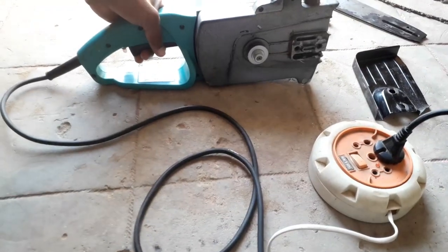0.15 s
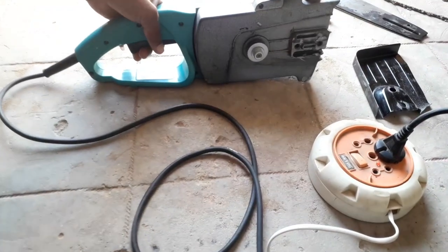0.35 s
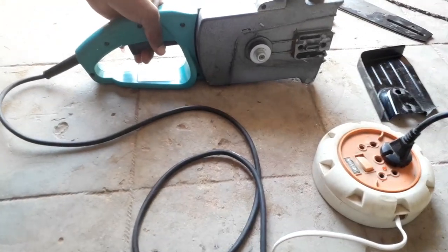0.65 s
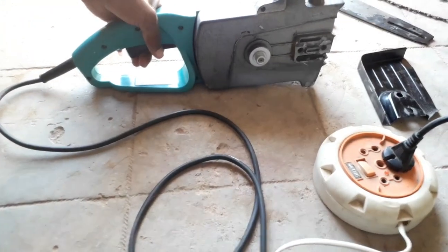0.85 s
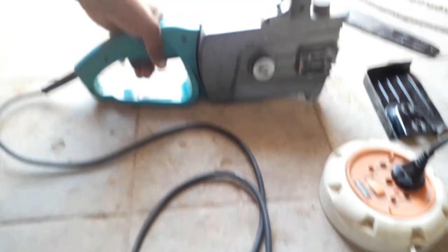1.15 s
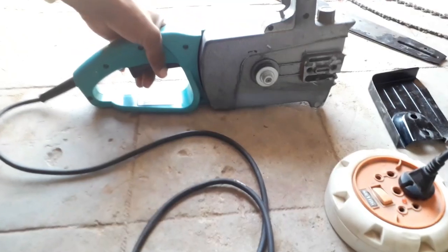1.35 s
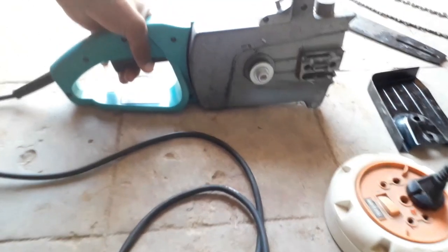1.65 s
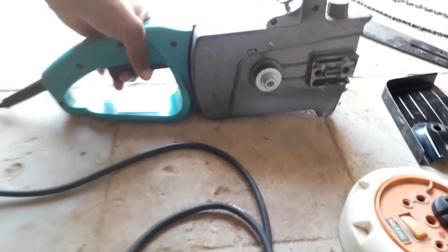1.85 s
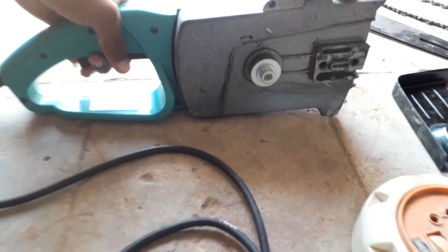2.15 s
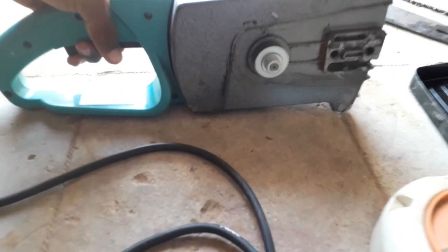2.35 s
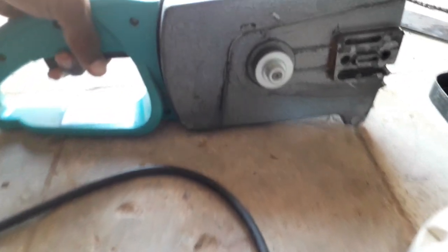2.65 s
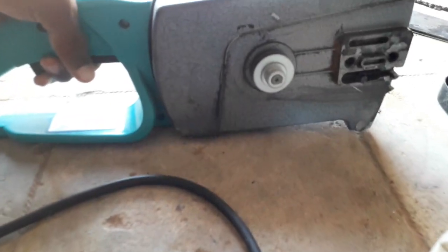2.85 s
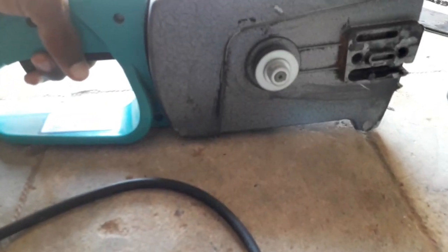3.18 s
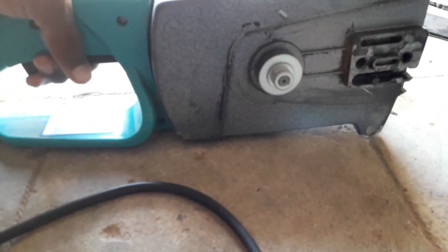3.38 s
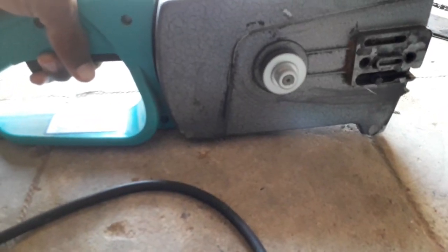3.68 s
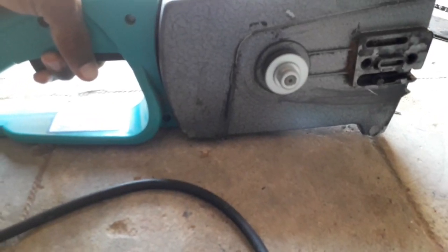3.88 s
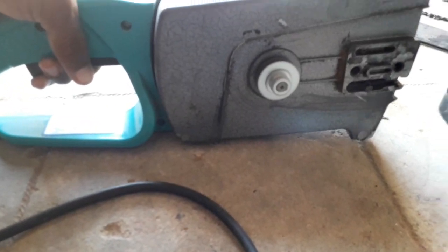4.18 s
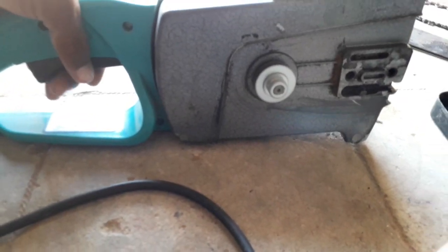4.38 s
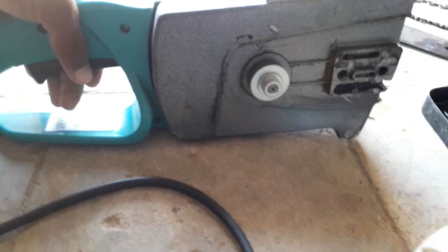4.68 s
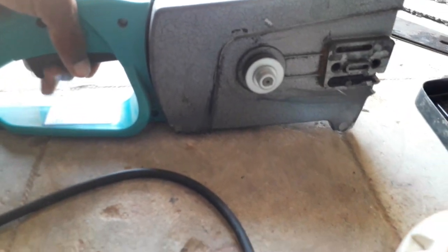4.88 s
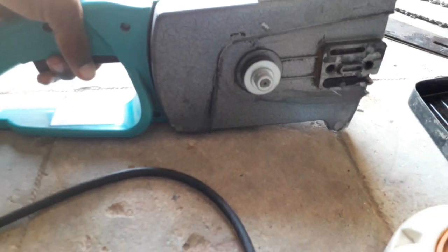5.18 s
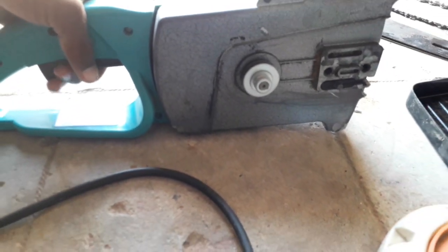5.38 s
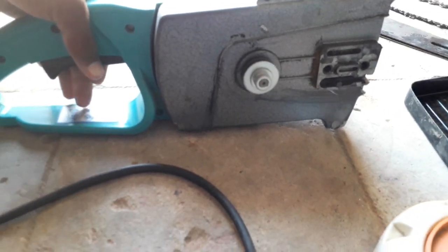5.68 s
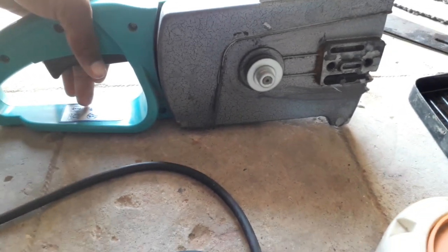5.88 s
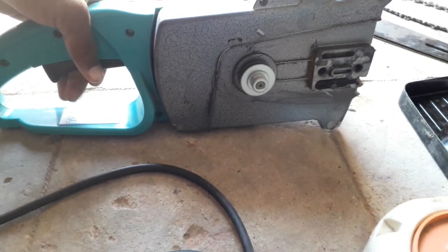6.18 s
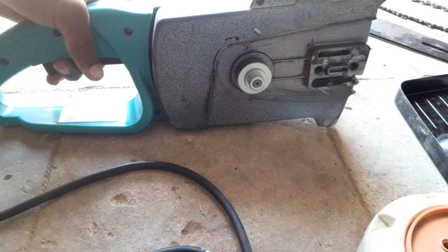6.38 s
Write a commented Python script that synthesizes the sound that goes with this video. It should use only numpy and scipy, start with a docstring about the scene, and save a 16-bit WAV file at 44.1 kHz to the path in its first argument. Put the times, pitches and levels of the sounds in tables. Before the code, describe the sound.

Close up in a hard-surfaced indoor space, the gears of a slowing electric chainsaw knock and rattle unevenly, ringing the housing. A two-second burst of power spins the motor up into a harsh, hissing grind with rushing air and a thin whine. The power cuts, the rasp swells briefly, and the motor coasts down as separate clacks come through again.

```python
"""Gears clack and grind in an electric chainsaw that lies on a stone floor without bar or chain.
Its motor coasts down, gets a two-second burst of power and coasts again. The unloaded teeth knock
across their backlash and ring the housing, the cooling fan rushes, the unbalanced rotor hums and the
commutator whines faintly. The close microphone's gain control and limiter hold the level."""
import sys
import numpy as np
from scipy import signal
from scipy.fft import rfft, irfft, next_fast_len
from scipy.io import wavfile
from scipy.ndimage import uniform_filter1d, minimum_filter1d

SR = 44100
rng = np.random.default_rng(int(sys.argv[2]) if len(sys.argv) > 2 else 0)


def wrap_up_sound(samples):
    """Save the sound to the file named by the first command line argument, as 16-bit audio."""
    columns = np.atleast_2d(samples).T
    # keep every value between -1 and 1, then stretch to whole-number steps
    tamed = np.clip(columns, -1, 1)
    steps = np.round(tamed * 32767).astype(np.int16)
    wavfile.write(sys.argv[1], SR, steps)


N = 288061
TIME = np.arange(N) / SR
TRIGGER_ON_S, TRIGGER_OFF_S = 2.26, 4.27
WORKING_SPEED_RPS = 300
LOAD_GEARS_DB = 5.5  # full torque presses the teeth together
CUTOFF_HZ = 15600


# Hardest knocks of the teeth. Each row: start in seconds, relative level in dB.
HARD_KNOCKS = [(0.0802, -2), (0.2443, -1), (0.2564, 1), (0.3287, 0), (0.3696, 0), (0.412, -1), (0.4509, 0),
               (0.6958, -2), (0.7447, -1), (0.7554, 0), (0.8859, 0), (1.0061, -3), (1.062, -1),
               (1.1074, -2), (1.1243, 0), (1.1648, -2), (1.1862, 0), (1.1964, 0), (1.3728, -3),
               (1.4436, -2), (1.517, 0), (1.5808, -1), (1.6487, -3), (1.6741, 0), (1.7414, 0), (1.8163, -1),
               (1.8337, -2), (1.9295, -5), (2.0248, -1), (2.0408, 0), (2.1171, -3), (2.1385, -1),
               (2.164, -4), (2.2333, -3), (2.2503, -3), (2.2847, 1), (2.3156, 1), (2.3324, 1), (2.4473, 1),
               (5.3014, -1), (5.5593, 0), (5.664, 0), (5.7224, 0), (5.7997, 0), (5.9125, 0), (5.9768, -4),
               (6.0132, 1), (6.094, -2), (6.1484, 1), (6.4088, -3), (6.5106, -1)]

def gear_knocks(turns, speed_rps, load, gain_db, scuff_s, scuff_share):
    """Teeth knock across their backlash: each hard contact scuffs briefly along the tooth."""
    rows = [*HARD_KNOCKS, *rebounds(speed_rps, loss_db=9), *light_knocks(turns, speed_rps, load)]
    force, age_s = np.zeros(N + SR), np.arange(SR // 200) / SR
    roughness = rng.standard_normal(N + SR)
    touch_to_peak_s = .0006
    for start_s, db in rows:
        at = round((start_s + touch_to_peak_s) * SR)
        scuff = roughness[at:at + len(age_s)] * np.exp(-age_s / scuff_s)
        knock = (age_s == 0) + scuff_share * scuff / np.linalg.norm(scuff)
        force[at:at + len(age_s)] += from_db(db + gain_db) * knock
    return struck_housing(force[:N])


def rebounds(speed_rps, loss_db):
    """The teeth meet again one rotor turn after each hard knock. Returns (s, dB) rows."""
    return [(s + 1 / np.interp(s, TIME, speed_rps), db - loss_db) for s, db in HARD_KNOCKS]


def light_knocks(turns, speed_rps, load, chance_per_turn=.4, spread_db=7):
    """In some turns the teeth lose contact and knock lightly. Returns (s, dB) rows."""
    count = int(turns[-1])
    draw, place, softness = rng.random((count, 3)).T
    start_s = np.interp(np.arange(count) + place, turns, TIME)
    top_db = -2 + speed_db(speed_rps, power=.28) + LOAD_GEARS_DB * load
    level_db = np.interp(start_s, TIME, top_db) - spread_db * softness
    return np.column_stack([start_s, level_db])[draw < chance_per_turn]


# Housing resonances. Each row: centre in Hz, width in Hz, lift in dB.
HOUSING_MODES = [(1200, 32, 6.5), (1985, 20, 5), (2471, 320, 9), (3310, 240, 8), (4180, 64, 2),
                 (5000, 260, -5.5), (5314, 260, 7), (6300, 310, 9.5), (8000, 160, 1.5), (9440, 230, 9)]
# Spectrum of a knock. Each row: frequency in Hz, relative density in dB.
KNOCK_SPECTRUM = [(60, -56), (300, -47), (900, -23.5), (1700, -11), (2700, -10.5), (3300, -4.5), (4500, -1),
                  (5050, 3), (5900, -9.5), (7400, -15.5), (8700, -12), (10200, -16.5), (12000, -27.5),
                  (15500, -36)]

def struck_housing(force, travel_s=.0005, floor_echo_s=.00103, floor_echo_db=-4.5):
    """Knocks cross the housing as bending waves, highs first; the stone floor reflects them."""
    hz = np.fft.rfftfreq(N, 1 / SR)
    lag_cycles = travel_s * (2 * np.sqrt(hz * CUTOFF_HZ) - hz)  # wave speed grows as sqrt(hz)
    dispersed = irfft(rfft(force) * np.exp(-2j * np.pi * lag_cycles), N)
    direct = coloured(dispersed, KNOCK_SPECTRUM, HOUSING_MODES)
    return direct + from_db(floor_echo_db) * delayed(direct, floor_echo_s)


# Spectrum of sliding teeth and brushes. Each row: frequency in Hz, relative density in dB.
GRIND_SPECTRUM = [(60, -30), (300, -28), (900, -28.5), (1400, -5.5), (1700, -1), (2700, -6), (3050, -2),
                  (4200, 7), (5300, -3), (5900, -8.5), (7500, -5), (9300, -13), (10800, -14),
                  (15500, -23.5)]

def grinding(turns, speed_rps, load, mesh_db, rattle_db):
    """Sliding teeth and brushes hiss; the mesh ticks tooth by tooth; the pinion rattles once a turn."""
    mesh = rms_one(contacts(turns, per_turn=8, spread_db=3) / np.sqrt(speed_rps))
    rattle = rms_one(contacts(turns, per_turn=1, spread_db=3) / np.sqrt(speed_rps))
    sliding = coloured(rng.standard_normal(N) + from_db(mesh_db) * mesh, GRIND_SPECTRUM, HOUSING_MODES)
    rattling = from_db(rattle_db) * struck_housing(rattle)
    level_db = -14.5 + speed_db(speed_rps, power=.68) + LOAD_GEARS_DB * load + overrun_db()
    return from_db(level_db) * rms_one(sliding + rattling)


def contacts(turns, per_turn, spread_db):
    """Contacts in step with the rotor, uneven in force and slightly uneven in timing."""
    at = np.flatnonzero(np.diff(np.floor(turns * per_turn + .15 * drift(300))) > 0)
    strength = from_db(spread_db * np.clip(rng.standard_normal(N), -2, 2))
    clicks = np.zeros(N)
    clicks[at] = (strength * rng.choice([-1, 1], N))[at]
    return clicks


def overrun_db(peak_db=2.5, rise_s=.23):
    """After trigger release the rasp swells as the driven gear pushes the slowing rotor."""
    age = np.maximum(TIME - TRIGGER_OFF_S, 0) / rise_s
    return peak_db * (age * np.exp(1 - age)) ** 2


def motor(start_rps=164.5, half_torque_rps=227.4, step_s=.002):
    """Speed (turns/s) and torque (0-1): the motor pulls while the trigger is held, against drag."""
    stall_rps_per_s = 896
    times_s, speed_rps, rows = np.arange(0, N / SR, step_s), start_rps, []
    for s in times_s:
        torque = (TRIGGER_ON_S < s < TRIGGER_OFF_S) / (1 + (speed_rps / half_torque_rps) ** 3.5)
        rows.append((speed_rps, torque))
        brush_drag, grease_drag, fan_drag = 26.7, .1207 * speed_rps, .000953 * speed_rps ** 2
        speed_rps += step_s * (stall_rps_per_s * torque - brush_drag - grease_drag - fan_drag)
    return [np.interp(TIME, times_s, column) for column in np.transpose(rows)]


# Spectrum of the casing draught. Each row: frequency in Hz, relative density in dB.
DRAUGHT_SPECTRUM = [(25, -27), (60, -30), (130, -11.5), (260, -10), (370, -2.5), (450, 1.5), (520, -1),
                    (610, 2.5), (720, -6), (950, -6.5), (1600, -13), (3000, -42), (8000, -31)]
# Vent jet hiss as heard through the microphone's 3-5.5 kHz presence boost.
# Each row: frequency in Hz, relative density in dB.
JET_WITH_MIC_BOOST = [(30, -41), (150, -13), (330, -0.5), (700, -2.5), (1600, 2), (2200, -14), (2750, 2),
                      (2950, 10), (5500, 11.5), (6000, 2.5), (8600, 2.5), (10400, -2), (11800, -1.5),
                      (15500, -12.5)]
# Air cavity modes of the motor casing. Each row: centre in Hz, width in Hz, lift in dB.
CAVITY_MODES = [(382, 36, -3.5), (467, 27, 3), (749, 25, 7.5), (844, 16, 4.5), (1110, 26, 6.5),
                (1705, 29, 1), (2390, 100, 6)]

def fan(speed_rps, flutter_db):
    """Air drones through the motor casing and, at high speed, jets out of the vents."""
    draught = coloured(rng.standard_normal(N), DRAUGHT_SPECTRUM, CAVITY_MODES)
    jet = coloured(rng.standard_normal(N), JET_WITH_MIC_BOOST, CAVITY_MODES)
    draught_db = -22 + speed_db(speed_rps, power=1.673)
    jet_db = -9 + speed_db(speed_rps, power=2.76) + flutter_db * drift(60)
    return from_db(draught_db) * draught + from_db(jet_db) * jet


# Rocking of the body on the floor. Each row: centre in Hz, width in Hz, lift in dB.
ROCKING_MODES = [(125, 13, 18), (184, 22, 8)]

def hum(turns, speed_rps, waver_db, octave_db):
    """Unbalance hums once a turn; its octave is heard only while it rocks the body."""
    fundamental = from_db(peaks_at(ROCKING_MODES, speed_rps)) * np.sin(2 * np.pi * turns)
    octave = (from_db(peaks_at(ROCKING_MODES, 2 * speed_rps)) - 1) * np.sin(2 * np.pi * 2 * turns)
    level_db = -32.5 + speed_db(speed_rps, power=3.74) + waver_db * drift(14)
    return np.sqrt(2) * from_db(level_db) * (fundamental + from_db(octave_db) * octave)


def jolt(gain_db, decay_s):
    """The kick of switching on rocks the body briefly in its lowest mode."""
    age_s = np.maximum(TIME - TRIGGER_ON_S, 0)
    envelope = (age_s / decay_s) ** 2 * np.exp(-age_s / decay_s)
    return from_db(gain_db) * envelope * np.sin(2 * np.pi * ROCKING_MODES[0][0] * age_s)


# Whine partials. Each row: multiple of rotor speed (rounded in use), level in dB, power of speed,
# change in dB as the microphone moves in.
WHINE_PARTIALS = [(32, -32, -0.2, -1.5), (36, -33.5, 5, 0.5), (48, -44, 5, -3), (64.4, -36.5, -0.5, -19),
                  (95, -47, -0.5, -8)]
# Radiation of the whine by the housing. Each row: frequency in Hz, gain in dB.
WHINE_RADIATION = [(1500, -6), (3500, -7.5), (4600, 1), (5700, 0), (6150, 2), (6700, 0), (8300, -3),
                   (8850, 7.5), (9300, 0.5), (10300, 2), (11600, 3), (12300, 0), (13200, -8), (15000, -14)]

def whine(turns, speed_rps, load, shiver_turns, waver_db, load_db=9, move_in_s=(1.2, 2.8)):
    """Commutator bars, slots and teeth whine through housing resonances; shaft shiver widens each tone."""
    out, shaft_turns = 0, turns + shiver_turns * drift(200)
    slow_fade = np.minimum(speed_rps / 100, 1) ** 2
    moved_in = np.interp(TIME, move_in_s, (0, 1))
    for multiple, db, power, change_db in WHINE_PARTIALS:
        order = round(multiple)
        hz = order * speed_rps
        level_db = db + speed_db(speed_rps, power) + load_db * load + change_db * moved_in
        level_db += at_hz(WHINE_RADIATION, hz) + waver_db * (drift(18) + drift(200))
        out += slow_fade * from_db(level_db) * (hz < CUTOFF_HZ) * np.sin(2 * np.pi * order * shaft_turns)
    return np.sqrt(2) * out


# Gusts from the vents. Each row: peak time in seconds, level in dB.
VENT_GUSTS = [(3.21, -39), (3.6, -41), (3.665, -41)]

def gusts(half_width_s, band_hz):
    """Each gust brushes the microphone with a short, soft rumble."""
    swell = sum(from_db(db) * np.exp(-((TIME - s) / half_width_s) ** 2) for s, db in VENT_GUSTS)
    band = signal.butter(2, band_hz, "band", fs=SR, output="sos")
    return swell * rms_one(signal.sosfilt(band, rng.standard_normal(N)))


def room(x, t60_s, level_db):
    """Hard walls return a short diffuse tail."""
    age_s = np.arange(SR // 2) / SR
    tail = rng.standard_normal(len(age_s)) * from_db(-60 * age_s / t60_s) * (age_s > .002)
    tail = signal.sosfilt(signal.butter(1, 7000, fs=SR, output="sos"), tail)
    return from_db(level_db) * signal.fftconvolve(x, tail / np.linalg.norm(tail))[:N]


def gain_control(x, window_s, threshold_db, cut_share, recovery_db_per_s):
    """The gain sinks when the sound gets loud and creeps back slowly."""
    level_db = 10 * np.log10(lagged(np.mean(x ** 2, axis=0), window_s) + 1e-12)
    cut_db = cut_share * np.maximum(level_db - threshold_db, 0)
    recovered_db = recovery_db_per_s * TIME
    return x * from_db(recovered_db - np.maximum.accumulate(cut_db + recovered_db))


def coloured(x, spectrum, modes):
    """Causal filter of unit energy: a smooth spectrum with resonances on top."""
    size = 2 * next_fast_len(N // 2 + SR // 4)
    hz = np.arange(size // 2 + 1) * SR / size
    level_db = at_hz(spectrum, hz) + peaks_at(modes, hz)
    cepstrum = irfft(np.log(rms_one(from_db(level_db))))
    cepstrum[1:size // 2] *= 2  # minimum phase: nothing sounds before its cause
    cepstrum[size // 2 + 1:] = 0
    return irfft(rfft(x, size) * np.exp(rfft(cepstrum)))[:N]


def at_hz(spectrum, hz):
    """Level in dB, interpolated on a log-frequency axis."""
    known_hz, level_db = np.transpose(spectrum)
    return np.interp(np.log(hz + 1), np.log(known_hz), level_db)


def peaks_at(modes, hz):
    """Lift in dB from a set of resonances."""
    return sum(db / (1 + (2 * (hz - centre_hz) / width_hz) ** 2) for centre_hz, width_hz, db in modes)


def speed_db(speed_rps, power):
    """Level relative to working speed, for an amplitude that follows a power of speed."""
    return 20 * power * np.log10(speed_rps / WORKING_SPEED_RPS)


def drift(rate_hz):
    """Smooth random wander of unit rms."""
    knots = rng.standard_normal(int(rate_hz * N / SR) + 2)
    return rms_one(np.interp(TIME * rate_hz, np.arange(len(knots)), knots))


def lagged(x, lag_s):
    """One-pole lag."""
    keep = np.exp(-1 / (lag_s * SR))
    return signal.lfilter([1 - keep], [1, -keep], x)


def delayed(x, delay_s):
    """The same sound, later."""
    return np.concatenate([np.zeros(round(delay_s * SR)), x])[:N]


def from_db(db):
    """Decibels to gain."""
    return 10 ** (np.asarray(db) / 20)


def rms_one(x):
    """Scale to unit rms."""
    return x / np.sqrt(np.mean(x ** 2) + 1e-20)


def scene():
    """The motor drives gears, fan and rotor tones; both channels carry the same sound."""
    speed_rps, torque = motor()
    turns = np.cumsum(speed_rps) / SR
    load = lagged(torque, lag_s=.01)
    knocks = gear_knocks(turns, speed_rps, load, gain_db=13, scuff_s=.0006, scuff_share=.38)
    gears = knocks + grinding(turns, speed_rps, load, mesh_db=-2, rattle_db=-2)
    air = fan(speed_rps, flutter_db=.72) + gusts(half_width_s=.015, band_hz=(50, 190))
    rotor = hum(turns, speed_rps, waver_db=1, octave_db=4) + jolt(gain_db=-40, decay_s=.015)
    rotor += whine(turns, speed_rps, load, shiver_turns=.0062, waver_db=2.5)
    saw = gears + air + rotor + room(knocks, t60_s=.2, level_db=-11)
    return np.array([saw, saw])


def record(dry):
    """Gain control, a very fast peak limiter, then a steep low-pass."""
    held = gain_control(dry, window_s=.033, threshold_db=-10, cut_share=.65, recovery_db_per_s=1.15)
    ceiling = .94
    needed_gain = ceiling / np.maximum(np.abs(held).max(axis=0), ceiling)
    limiter_gain = uniform_filter1d(minimum_filter1d(needed_gain, size=21), size=21)
    low_pass = signal.ellip(12, .1, 80, CUTOFF_HZ, fs=SR, output="sos")
    return signal.sosfilt(low_pass, limiter_gain * held)


dry = scene()
out = record(dry)
wrap_up_sound(out)
```